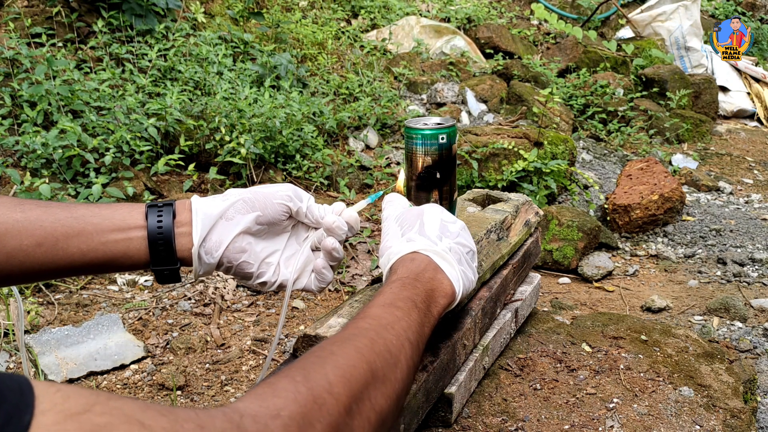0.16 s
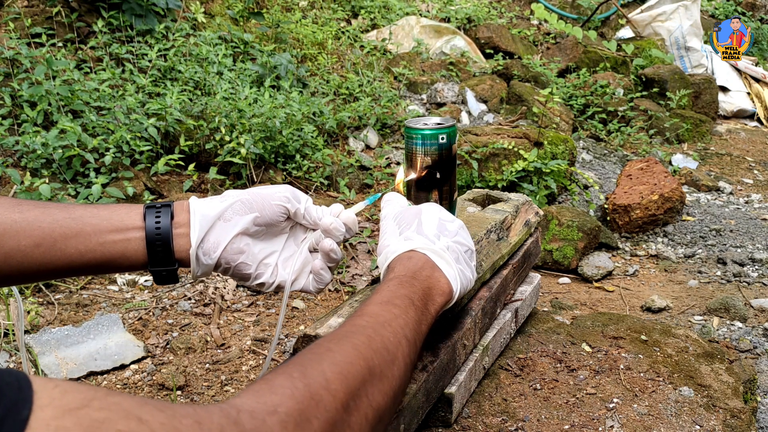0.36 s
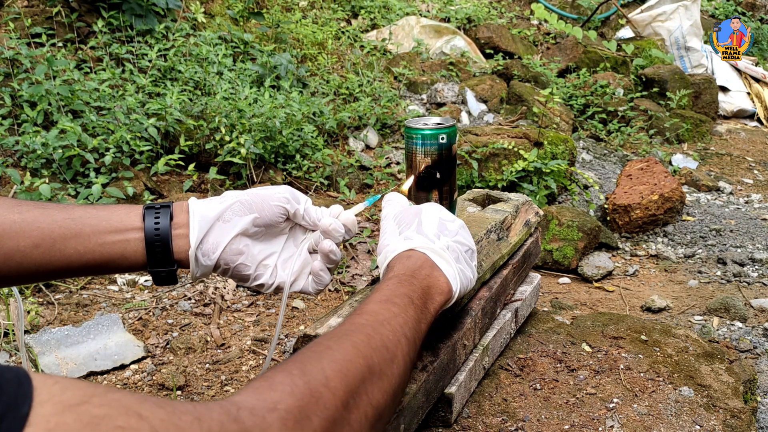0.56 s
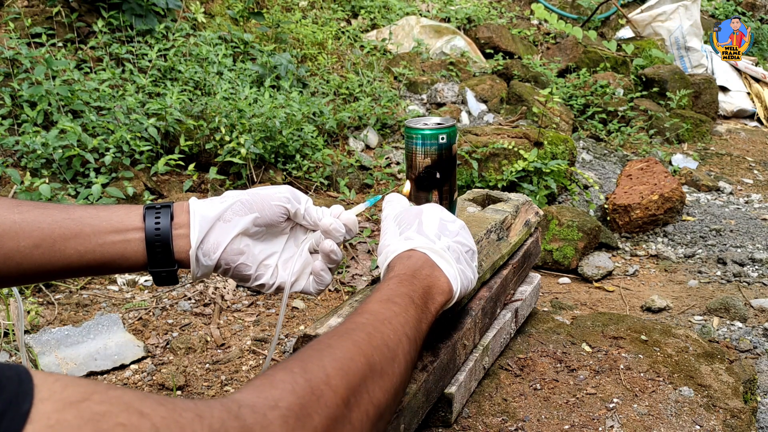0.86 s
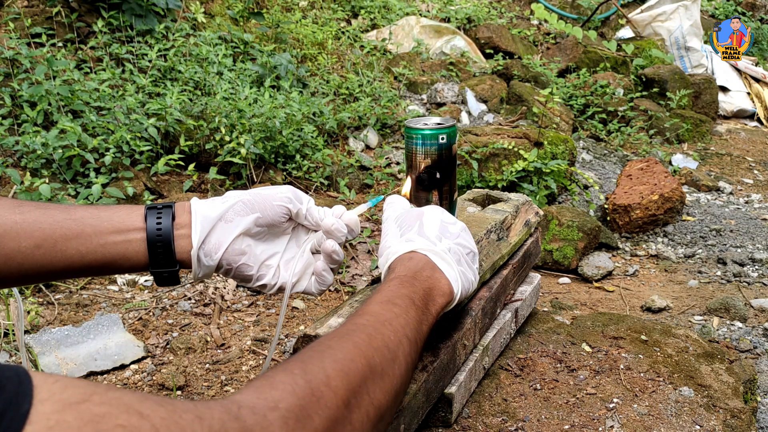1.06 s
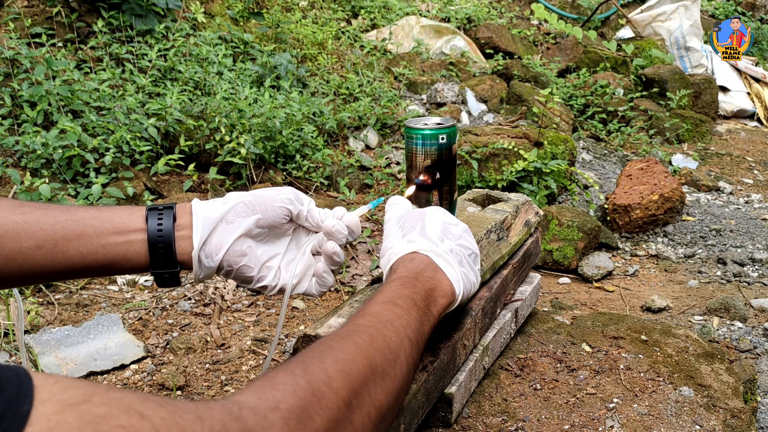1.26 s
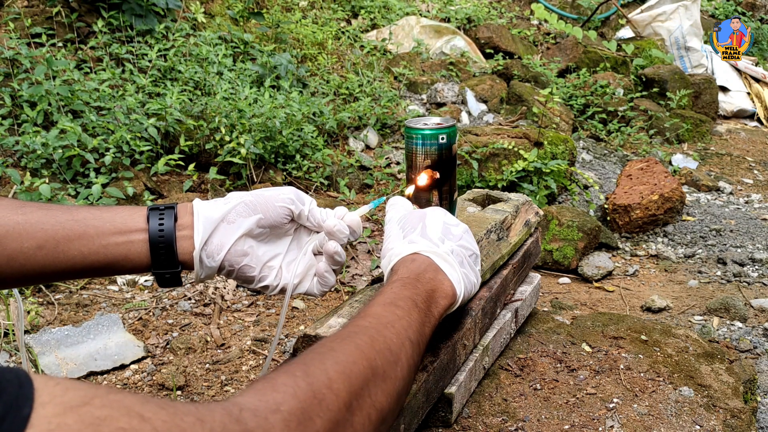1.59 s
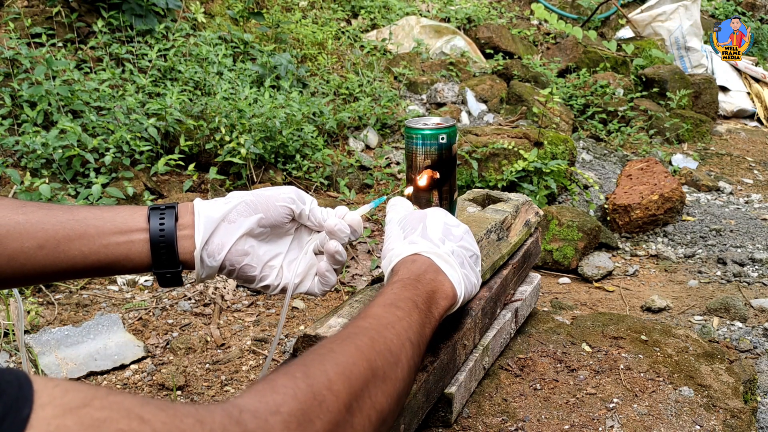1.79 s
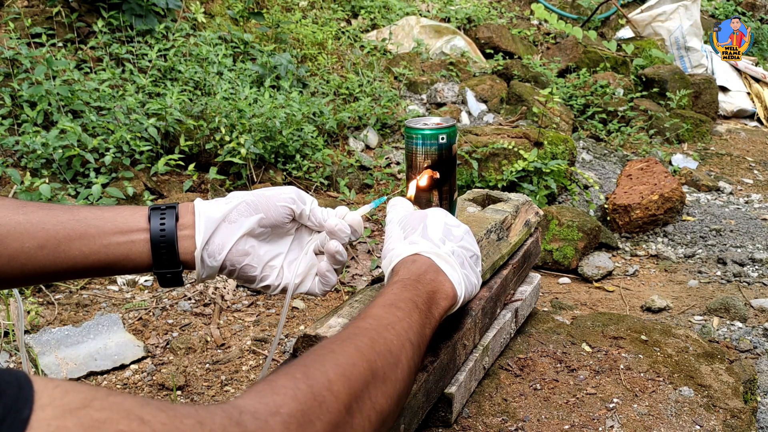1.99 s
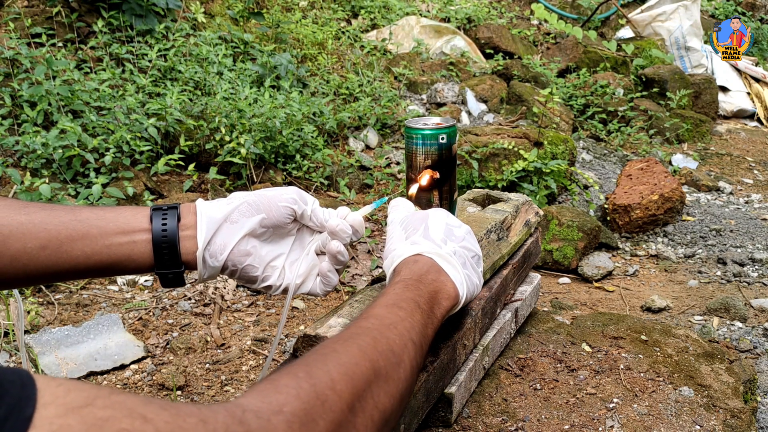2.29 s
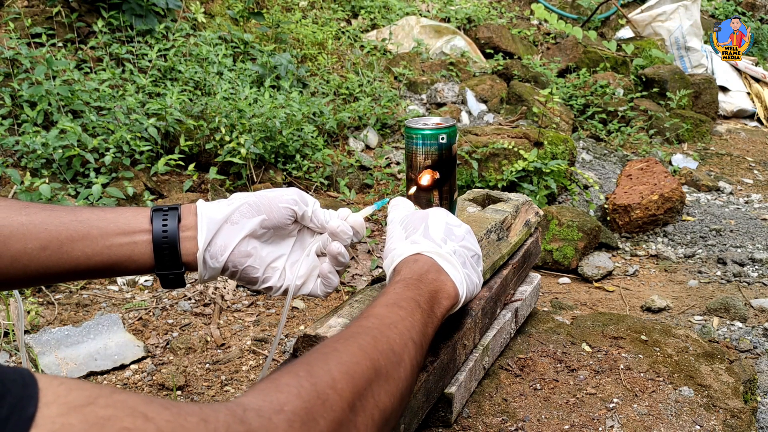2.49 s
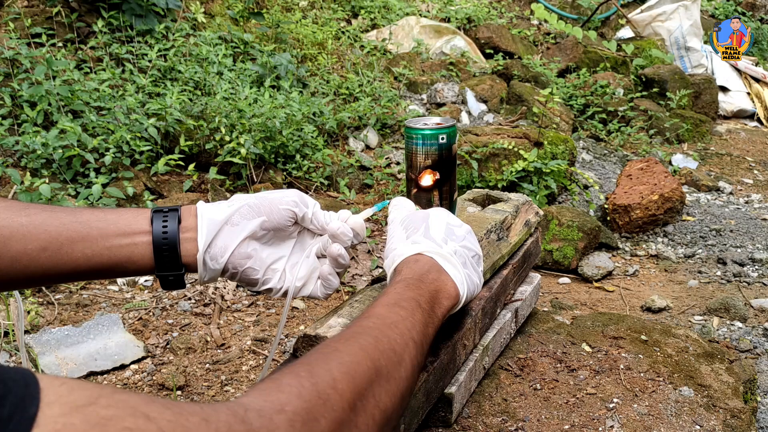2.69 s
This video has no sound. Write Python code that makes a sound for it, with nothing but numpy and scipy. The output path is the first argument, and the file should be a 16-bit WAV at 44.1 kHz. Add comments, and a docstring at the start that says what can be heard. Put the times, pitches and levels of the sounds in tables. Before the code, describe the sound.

Small gas torch sputtering against a drink can, settling into a hollow roar, then popping out.

```python
"""Outdoors in a quiet yard, a two-port microphone close to a small gas torch held to a hole in a drink can.
At first the flame keeps catching with a pop and tearing off the nozzle with a spit of hiss.
From about 1.2 s it stays lit and flutters, still sputtering, while gas hisses past the rim of the hole.
By 1.8 s it has settled into a hollow roar inside the ringing can; near 2.8 s three last pops blow it out.
Faint air and one far insect are left in the background."""
import sys
import numpy as np
from scipy import signal
from scipy.fft import rfft, irfft, next_fast_len
from scipy.io import wavfile
from scipy.ndimage import map_coordinates

SR = 44100
rng = np.random.default_rng(int(sys.argv[2]) if len(sys.argv) > 2 else 0)


def inscribe(sig):
    """Save sig as 16-bit PCM at rate SR to the path in sys.argv[1].

    A 1-D sig is mono; a 2-D sig holds one channel per row.
    Samples are clipped to [-1, 1] before scaling.
    """
    pcm = np.round(np.clip(np.atleast_2d(sig).T, -1, 1) * 32767)
    wavfile.write(sys.argv[1], SR, pcm.astype(np.int16))


N = 125685
T = np.arange(N) / SR
FFT_SIZE = next_fast_len(N + SR // 2, True)
HZ = np.maximum(np.arange(FFT_SIZE // 2 + 1) * SR / FFT_SIZE, 1)

# Table levels are relative: each source and filter adds its own gain.
# the gas catches: t/s, level/dB, flame growth time/ms
POPS = [(.2792, 4, 0.13), (0.4691, -9.5, 0.33), (0.4956, -3, 0.12), (0.5192, 1.5, 0.43),
        (.7078, -0.5, 0.36), (.8934, 0.5, 0.18), (.9160, -5, 0.19), (0.9245, 3, 0.17), (0.9398, -5.5, 1),
        (0.9736, 3.5, 0.24), (1.0104, 0.5, 0.17), (1.1364, -4, 0.23), (1.1869, 0.5, 0.64), (1.2560, -5, .3),
        (1.2670, -7, 0.54), (1.2810, -12, 0.29), (1.3704, -9.5, 0.75), (1.3995, -2.5, 0.3),
        (1.5021, 2.5, 0.29), (1.6172, 0.5, 0.29), (2.7680, 1, 0.32), (2.7785, 2.5, 0.22), (2.7862, 2, 0.16)]
# spectra of a pop's body and of its treble snap: f/Hz, level/dB
POP_SPECTRUM = [(60, 17), (90, 15.5), (150, 8), (300, 5), (700, 0), (1400, -5.5), (3000, -4.5),
                (5000, -2.5), (9000, -2), (15000, 0)]
SNAP_SPECTRUM = [(2000, 4), (4500, -32), (6500, 5), (9000, -5), (12000, -9.5), (15500, -4)]
# the flame tears off: t/s at the peak, hiss level/dB, half length/ms, rush level/dB
SPITS = [(0.299, -19, 2.4, -19.5), (0.36, -25, 1.6, -17), (0.398, -21, 3.6, -19), (.480, -22.5, 3.1, -23.5),
         (0.516, -23, 2.9, -33), (0.607, -23, 2.26, -22), (0.688, -31.5, 3.8, -16.5),
         (0.714, -22.5, 4.7, -17), (.907, -19, 2.2, -18), (0.922, -25, 2.7, -20), (0.936, -24.5, 3.9, -23),
         (0.969, -22.5, 1.9, -23.5), (1.001, -23.5, 2.4, -19), (1.014, -21.5, 2.8, -20.5),
         (1.151, -18, 1.4, -21.5), (1.195, -24, 5.2, -20), (1.225, -25, 2.8, -14.5),
         (1.266, -27.5, 2.1, -28), (1.374, -27.5, 3.2, -27), (1.404, -26, 2.8, -19), (1.434, -22, 3.5, -20),
         (1.461, -26.5, 3.3, -16.5), (1.492, -25.5, 4, -17), (1.517, -25.5, 7.3, -21.5),
         (1.558, -24, 7.4, -20.5), (1.597, -23, 6.1, -20.5), (1.619, -25.5, 5.8, -20.5),
         (1.665, -23.5, 5.9, -18.5), (2.773, -26.5, 4.9, -32), (2.784, -15.5, 0.75, -33),
         (2.851, -29.5, 5.8, -25)]
# spectra of a spit's hiss and of the rush behind it: f/Hz, level/dB
HISS_SPECTRUM = [(800, 2.5), (1800, -17), (2800, -0.5), (4000, -0.5), (6300, 0.5), (7800, -9), (9000, -6.5),
                 (10000, -13), (11600, -2.5), (13000, -13.5), (15500, -30)]
RUSH_SPECTRUM = [(60, -38), (130, -6), (220, -11), (400, -13), (800, -12), (1600, 0), (2200, -10),
                 (2900, -2.5), (4500, -19.5), (9000, -38), (15000, -23)]
# flame inside the can: t/s, level/dB, pitch ratio of its hollow colour
ROAR_CURVE = [(1.22, -94, .75), (1.28, -31.5, 0.82), (1.55, -32.5, 0.85), (1.70, -32, 0.92),
              (1.79, -22, 0.98), (1.92, -22.5, 1.004), (2.2, -21, 1.003), (2.45, -22.5, 0.98),
              (2.62, -22, .975), (2.765, -22, 1), (2.782, -17.5, 0.88), (2.792, -54, 1.5)]
# spectrum of that roar at ratio 1: f/Hz, level/dB
ROAR_SPECTRUM = [(50, -42.5), (130, -21), (200, -13), (310, -6), (450, -2), (600, -0.5), (720, 1.5),
                 (900, 1.5), (1200, 0.5), (1280, 1), (1360, -11), (1480, -16), (1700, -15), (2000, -8.5),
                 (2250, -4.5), (2370, -15), (2520, -19.5), (3100, -26), (3450, -32), (5300, -34),
                 (5660, -19), (6200, -42), (7370, -26), (8110, -46), (11100, -37.5), (15500, -44)]
# the flame holds between spits: start t/s, end t/s, level/dB
FLAME_HOLDS = [(0.331, 0.418, -31), (0.622, 0.71, -31), (0.886, 0.947, -43), (1.132, 1.252, -37)]
# open flame once it stays lit: t/s, level/dB
FLAME_CURVE = [(1.22, -76), (1.25, -29.5), (1.33, -25), (1.54, -29.5), (1.70, -24), (1.80, -29), (2.0, -38),
               (2.4, -64), (2.62, -31), (2.74, -27.5), (2.783, -25), (2.792, -60)]
# spectrum of the open flame: f/Hz, level/dB
FLAME_SPECTRUM = [(50, -10), (130, -38), (200, -6), (300, 0.5), (700, 3), (1000, 5.5), (1210, -2.5),
                  (1500, 4), (1950, 0), (2100, -3.5), (2380, -8), (2700, 0), (3200, -5.5), (4000, -13),
                  (6000, -13.5), (7900, -24.5), (9000, -17.5), (9800, -38), (11600, -21), (15500, -27.5)]
# gas hissing past the rim of the hole: t/s, level/dB
JET_CURVE = [(1.2, -72), (1.3, -38.5), (1.6, -48), (1.72, -33.5), (1.85, -37.5), (2.05, -43.5),
             (2.35, -48.5), (2.6, -43), (2.75, -36.5), (2.785, -44), (2.795, -71)]
# spectrum of that hiss: f/Hz, level/dB
JET_SPECTRUM = [(1500, -22.5), (3000, -1.5), (4400, -2.5), (5200, -4), (5750, -1), (6300, -2), (7300, -4),
                (8000, -13), (9000, -5.5), (9700, -18), (11200, -3.5), (12300, -19), (15500, -18)]
# the jet nearly whistles on the rim: t/s, half length/s, f/Hz, level/dB
WHISTLES = [(0.296, .003, 3180, -36), (0.607, 0.0032, 2776, -34.5), (0.908, .003, 2800, -29),
            (0.91, 0.0024, 3500, -38), (1.152, 0.0023, 2600, -28), (1.229, 0.003, 2795, -24.5),
            (1.226, .005, 4290, -36), (1.433, 0.0034, 2865, -26), (1.559, .005, 3170, -34),
            (1.665, .01, 6000, -36), (1.915, 0.02, 4450, -41)]
# resonances of the can: f/Hz, level/dB, t60/s
CAN_MODES = [(305, -12, .15), (738, -6.5, .08), (1513, -11, .2), (1787, -7, .16), (1989, -11, .15),
             (2621, -11, .12), (3196, -13, .1)]
# peaks and dips from hands, bench and ground on the way to the microphone: f/Hz, level/dB
PATH_RESPONSE = [(30, -24), (60, 2), (88, 4.5), (135, -5.5), (165, -2), (210, 2.5), (245, -2), (310, 1.5),
                 (370, -1), (430, -6.5), (520, -1.5), (660, -2.5), (735, 2.5), (785, -4.5), (830, -9),
                 (885, -1.5), (1020, -0.5), (1300, -1), (15000, -0.5), (16000, -29)]
# tone of the yard's echoes: f/Hz, level/dB
YARD_RESPONSE = [(80, 2.5), (300, -4.5), (1000, -2), (3000, -4), (8000, -5), (15000, 1)]
# stereo width of the yard: f/Hz, side level/dB
YARD_WIDTH = [(100, -31), (400, -8), (900, 9), (2500, -7), (6000, -10), (12000, -4)]
# background air: t/s, level/dB
AIR_CURVE = [(0, -56), (.2, -61), (.85, -65.5), (2.85, -66)]
# spectrum of the air: f/Hz, level/dB
AIR_SPECTRUM = [(25, -11), (60, -6), (130, -6), (200, -14.5), (280, -11.5), (420, -19), (580, -18.5),
                (1030, -11.5), (1180, -16), (1300, -16), (1400, -28), (1650, -24), (2100, -24.5),
                (2800, -24), (4000, -34), (7500, -36), (15500, -33.5)]
# faint steady tones in the yard: f/Hz, width/Hz, level/dB relative to the air
AIR_TONES = [(1540, 51, -14), (1915, 79, -12)]
# balance of the microphone ports: f/Hz, left minus right level/dB
PORT_BALANCE = [(60, 0.0), (75, 0.5), (93, 0.5), (120, 0.5), (150, 0.5), (180, 1.5), (230, 1.0),
                (280, -0.5), (350, 0.0), (440, -0.5), (550, 2.5), (680, 3.5), (850, -1.5), (1060, -1.0),
                (1320, 2.5), (1650, -1.5), (2060, 0.5), (2560, -3.5), (3200, -0.5), (3990, 1.0),
                (4970, 0.0), (6200, 2.0), (7730, 3.5), (9640, -0.5), (12000, -2.0), (15000, 1.0)]
# phase between the ports, before limiting: f/Hz, lead of the left/rad
PORT_PHASE = [(0, 0), (780, -0.6), (1120, 0.7), (1380, -0.8), (1640, 0.5), (2330, -0.6), (3010, 0.2),
              (5340, -0.5), (5600, 0.2), (6200, -0.8), (6980, -0.4), (8010, -2.9), (9130, -1.7),
              (9910, -2.9), (11600, -0.4), (12900, -0.5), (15200, -2.8), (16100, -1.4)]
# scatter that differs between the ports: f/Hz, level/dB
PORT_SCATTER = [(100, -26), (350, -20), (600, -12), (1200, -7), (2500, -12), (5000, -7), (9000, -1),
                (15000, -2)]


def pops(collapse_ms=0.069, ragged_ms=1.2, smear_hz=700):
    """The gas catches: heat release grows and abruptly collapses; the pressure is its rate of change."""
    pressure, ms = np.zeros(N), T * 1000
    count = SR // 100
    for s, db, growth_ms in POPS:
        age_ms = ms - s * 1000
        heat = np.exp(-np.minimum(np.logaddexp(-age_ms / growth_ms, age_ms / collapse_ms), 20))
        pulse = np.gradient(heat)
        # the flame front is ragged, so each pop trails off in its own way
        front = rng.standard_normal(count) * np.exp(-ms[:count] / ragged_ms)
        front *= from_db(-10) / np.linalg.norm(front)
        front[0] = 1
        pressure += from_db(db - 2.5) * signal.oaconvolve(pulse / np.abs(pulse).max(), front)[:N]
    pole = np.exp(-2 * np.pi * smear_hz / SR)
    smeared = signal.lfilter([pole, -1], [1, -pole], pressure + 1e-18)   # all-pass: the lows come late
    return colour(butterworth(smeared, "high", hz=255), POP_SPECTRUM)


def thump(x):
    """A faint low ring follows each pop."""
    return x + from_db(-5.5) * resonate(x, hz=85, width_hz=11)


def snaps(decay_ms=1.2, reference_growth_ms=0.18):
    """Each pop opens with a snap of treble; faster flame growth snaps harder."""
    level = 0
    for s, db, growth_ms in POPS:
        age_ms = (T - s) * 1000
        decay = (age_ms > 0) * np.exp(-np.clip(age_ms / decay_ms, 0, 20))
        level += from_db(db - 24.5) * reference_growth_ms / growth_ms * decay
    return level * noise(SNAP_SPECTRUM)


def spits(rush_lag_s=0.0016, puff_lag_s=0.0071):
    """The flame tears off the nozzle: a swell of bright hiss, a lower rush just behind, then a dull puff."""
    hiss, rush, puff = 0, 0, 0
    for s, hiss_db, half_ms, rush_db in SPITS:
        half_s = half_ms / 1000
        hiss += from_db(hiss_db - 0.5) * swell(s, half_s)
        rush += from_db(rush_db - 3.5) * swell(s + rush_lag_s, half_s * 1.13)
        puff += from_db(rush_db - 16.5) * swell(s + puff_lag_s, half_s=0.0011)
    burst = hiss * noise(HISS_SPECTRUM) + rush * noise(RUSH_SPECTRUM)
    burst += puff * narrow_noise(hz=650, width_hz=550)
    return butterworth(burst + 1e-18, "high", hz=200)


def roar():
    """The flame burns inside the can: a hollow noise whose humps rise in pitch as it settles."""
    db, pitch_ratio = in_time(ROAR_CURVE)
    gliding = map_coordinates(noise(ROAR_SPECTRUM), [np.cumsum(pitch_ratio)], order=3, mode="wrap")
    return from_db(db) * flutter(depth_db=1.45, rate_hz=34.6) * gliding


def open_flame(edge_s=.003):
    """Turbulent burning in the open air, at first in short holds, then staying lit."""
    level = from_db(in_time(FLAME_CURVE)[0])
    for start, end, db in FLAME_HOLDS:
        gate = (np.tanh((T - start) / edge_s) - np.tanh((T - end) / edge_s)) / 2
        level += from_db(db) * gate
    return level * flutter(depth_db=2.6, rate_hz=106) * noise(FLAME_SPECTRUM)


def jet():
    """Smooth hiss of gas past the rim, sinking while the flame sits well inside the can."""
    return from_db(in_time(JET_CURVE)[0]) * noise(JET_SPECTRUM)


def whistles(waver_share=.06):
    """Short, unsteady edge tones where the jet grazes the rim of the hole, each at its own pitch."""
    tones = 0
    for s, half_s, hz, db in WHISTLES:
        pitch_hz = hz * (1 + waver_share * wander(rate_hz=395))
        tone = rms_one(np.sin(2 * np.pi * np.cumsum(pitch_hz) / SR))
        tones += from_db(db + 5.5) * swell(s, half_s) * tone
    return tones


def can(x):
    """The can rings along with the flame."""
    return x + sum(from_db(db - 5) * resonate(x, hz, width_hz=np.log(1000) / (np.pi * t60))
                   for hz, db, t60 in CAN_MODES)


def yard(x):
    """Close scatter from hands, bench and ground, then a faint tail from stones and bushes farther off."""
    near = from_db(-12) * echoes(x, t60_s=0.076)
    far = from_db(-13.5) * echoes(x, t60_s=0.25)
    return colour(near + far, YARD_RESPONSE)


def background():
    """Still air with two faint tones, and a thin insect in the distance."""
    air = noise(AIR_SPECTRUM)
    tones = sum(from_db(db) * narrow_noise(hz, width_hz) for hz, width_hz, db in AIR_TONES)
    insect = from_db(-76) * narrow_noise(hz=9380, width_hz=130)
    return from_db(in_time(AIR_CURVE)[0]) * (air + tones) + insect


def microphone(x, phase_limit_rad=1.45):
    """Each of the two ports hears the sound with its own ripple of level and phase."""
    phase = np.clip(at_hz(PORT_PHASE), -phase_limit_rad, phase_limit_rad)
    left = from_db(at_hz(PORT_BALANCE) / 2) * np.exp(.5j * phase)
    pair = np.array([left, 1 / left])
    return irfft(rfft(x, FFT_SIZE) * pair / np.abs(pair.mean(0)), FFT_SIZE)[:, :N]


def from_db(db):
    """Decibels to gain."""
    return 10 ** (np.asarray(db) / 20)


def rms_one(x):
    """Scale to rms 1."""
    return x / np.sqrt(np.mean(x ** 2) + 1e-20)


def in_time(rows):
    """Each column of a curve at every sample."""
    s, *columns = np.transpose(rows)
    return [np.interp(T, s, column) for column in columns]


def at_hz(points):
    """A table read on the log-frequency axis."""
    hz, value = np.transpose(points)
    return np.interp(np.log(HZ), np.log(np.maximum(hz, 1)), value)


def colour(x, points):
    """Causal (minimum-phase) filter shaped by rows of f/Hz, level/dB."""
    cepstrum = irfft(np.log(from_db(at_hz(points))), FFT_SIZE)
    cepstrum[1:FFT_SIZE // 2] *= 2
    cepstrum[FFT_SIZE // 2 + 1:] = 0
    return irfft(rfft(x, FFT_SIZE) * np.exp(rfft(cepstrum)), FFT_SIZE)[..., :N]


def butterworth(x, kind, hz):
    """Second-order low-pass or high-pass."""
    return signal.sosfilt(signal.butter(2, hz, kind, fs=SR, output="sos"), x)


def resonate(x, hz, width_hz):
    """One resonance, gain 1 at its peak."""
    radius = np.exp(-np.pi * width_hz / SR)
    feedforward = np.array([1, 0, -1]) * (1 - radius ** 2) / 2
    feedback = [1, -2 * radius * np.cos(2 * np.pi * hz / SR), radius ** 2]
    return signal.lfilter(feedforward, feedback, x + 1e-18)


def noise(spectrum):
    """Coloured noise, rms 1."""
    return rms_one(colour(rng.standard_normal(N), spectrum))


def narrow_noise(hz, width_hz):
    """Noise twice through a resonance, rms 1."""
    return rms_one(resonate(resonate(rng.standard_normal(N), hz, width_hz), hz, width_hz))


def wander(rate_hz):
    """Random drift, mostly slower than the given rate, rms 1."""
    return rms_one(butterworth(rng.standard_normal(N), "low", rate_hz))


def flutter(depth_db, rate_hz):
    """A randomly wavering gain, rms 1."""
    return rms_one(from_db(depth_db * wander(rate_hz)))


def swell(s, half_s):
    """A bell-shaped envelope centred on time s."""
    return np.exp(-.5 * np.minimum(((T - s) / half_s) ** 2, 100))


def echoes(x, t60_s, gap_s=.002):
    """Dense dying echoes with about as much energy as the sound itself."""
    t = T[:SR // 2]
    tail = rng.standard_normal(len(t)) * from_db(-60 * t / t60_s) * (t > gap_s)
    return signal.fftconvolve(x, tail / np.linalg.norm(tail))[:N]


def scene(sputter_pan_db=-.6, steady_pan_db=0.7):
    """Flame and can close in front of the microphone, the yard all around; pans are left minus right."""
    sputter = thump(pops()) + snaps() + spits() + open_flame() + whistles()
    sputter = can(colour(sputter, PATH_RESPONSE))
    steady = can(colour(roar() + jet(), PATH_RESPONSE))
    flame = sputter + steady
    sides = np.array([[1], [-1]])   # left, right
    direct = sputter * from_db(sides * sputter_pan_db / 2) + steady * from_db(sides * steady_pan_db / 2)
    width = colour(yard(flame) + background(), YARD_WIDTH)
    scatter = colour(echoes(flame, t60_s=.035), PORT_SCATTER)
    return microphone(direct + yard(flame) + background()) + sides * (width + scatter)


def record(dry, overload=.8, cutoff_hz=15700):
    """The recorder rounds off the loudest peaks and cuts the top steeply."""
    rounded = dry / (1 + (dry / overload) ** 4) ** .25
    return signal.sosfilt(signal.ellip(10, .1, 80, cutoff_hz, fs=SR, output="sos"), rounded)


dry = scene()
out = record(dry)
inscribe(out)
```